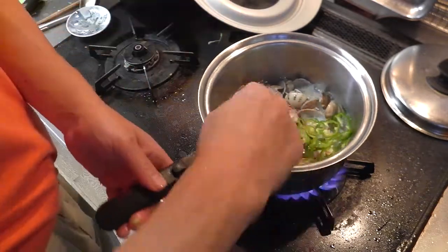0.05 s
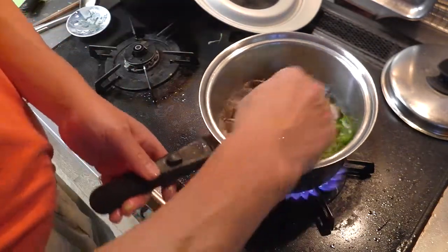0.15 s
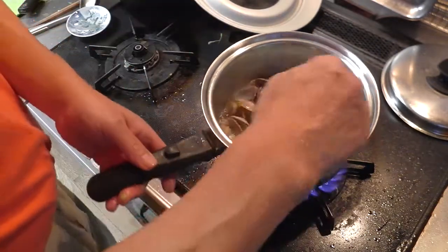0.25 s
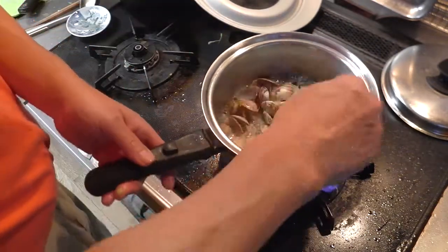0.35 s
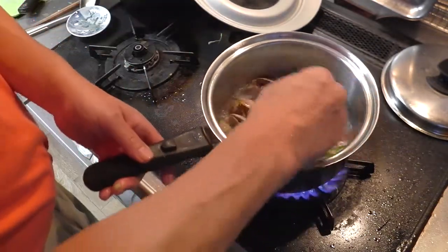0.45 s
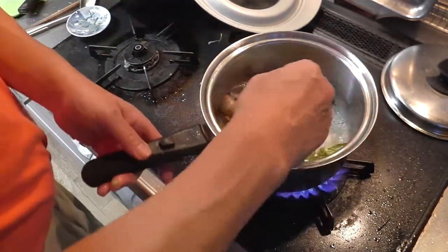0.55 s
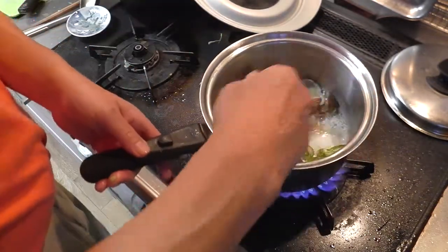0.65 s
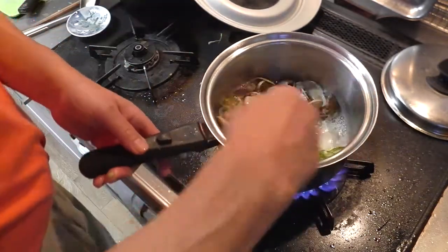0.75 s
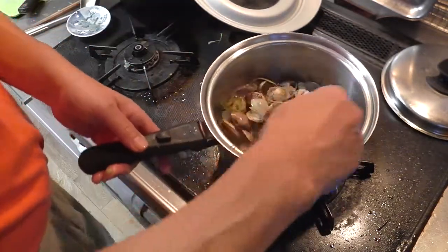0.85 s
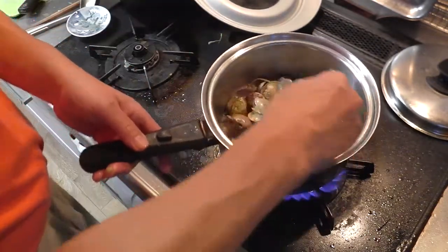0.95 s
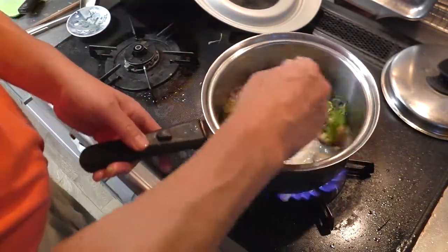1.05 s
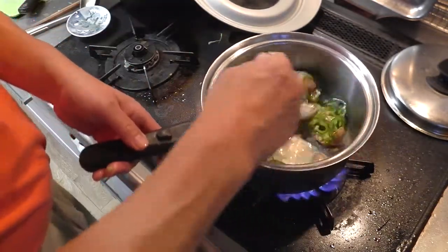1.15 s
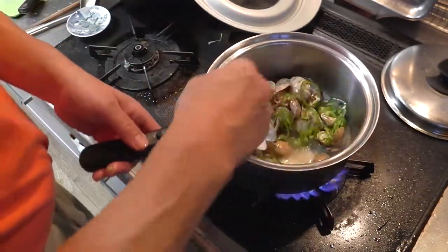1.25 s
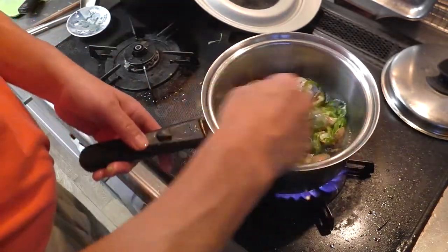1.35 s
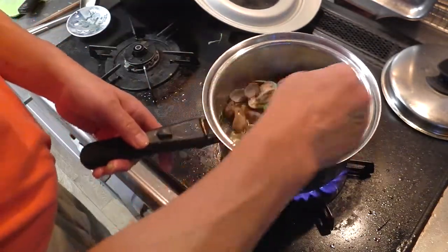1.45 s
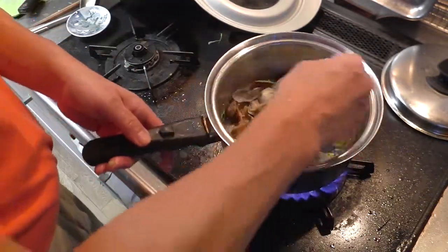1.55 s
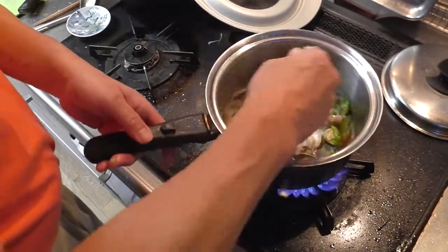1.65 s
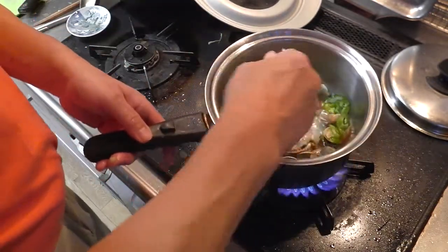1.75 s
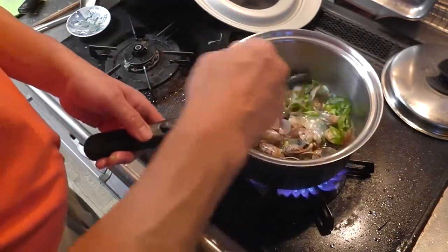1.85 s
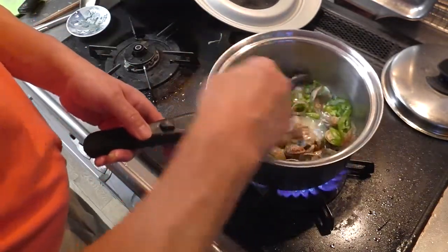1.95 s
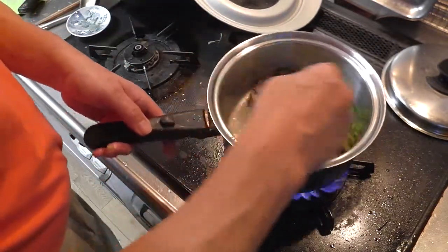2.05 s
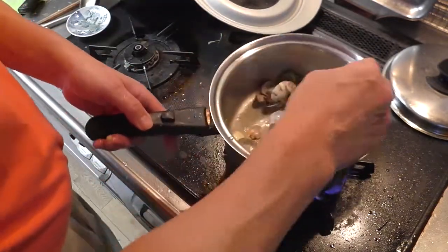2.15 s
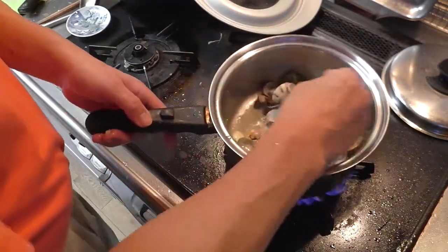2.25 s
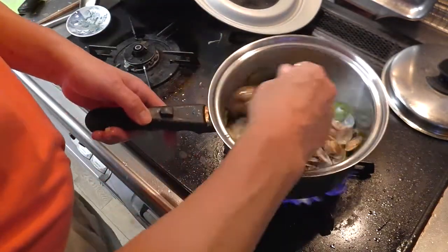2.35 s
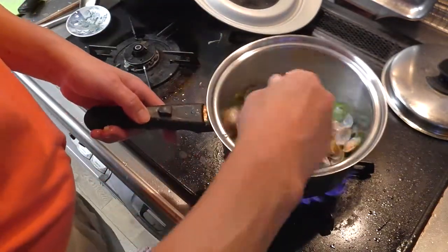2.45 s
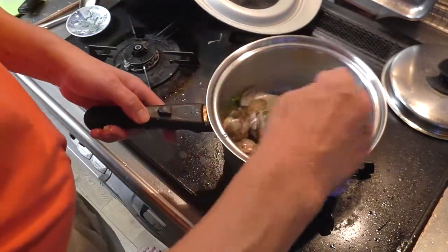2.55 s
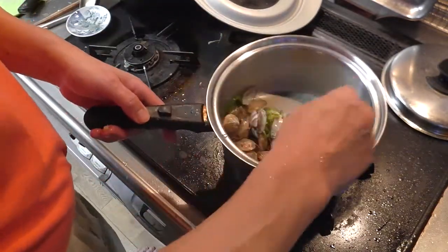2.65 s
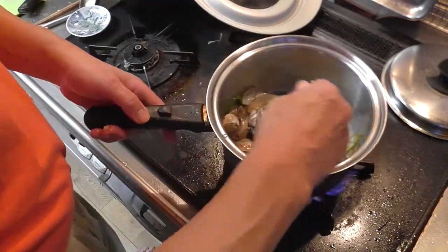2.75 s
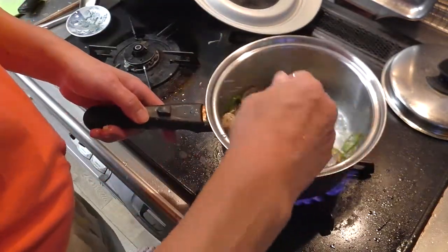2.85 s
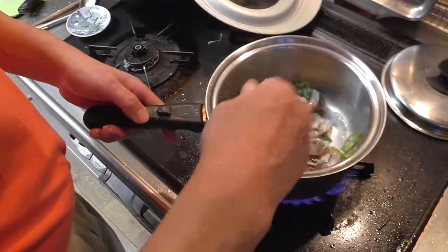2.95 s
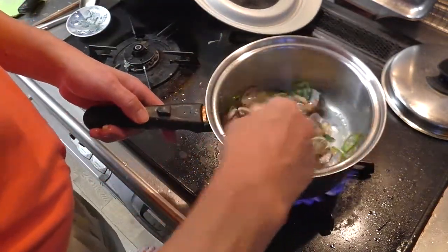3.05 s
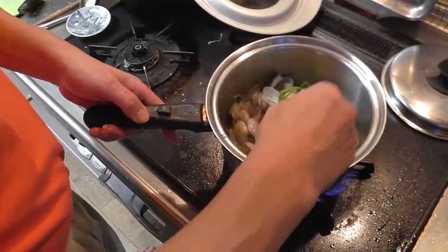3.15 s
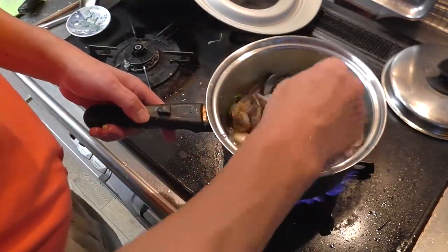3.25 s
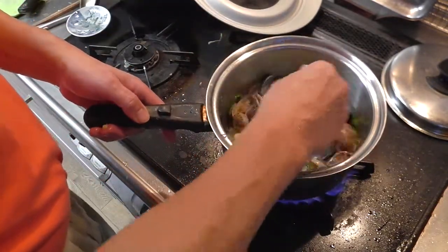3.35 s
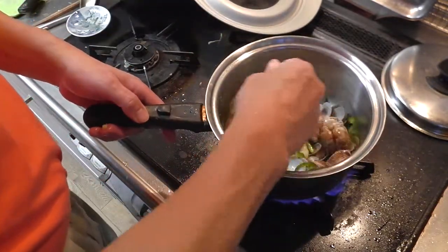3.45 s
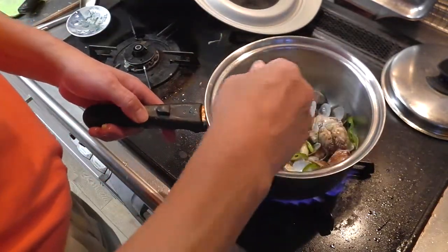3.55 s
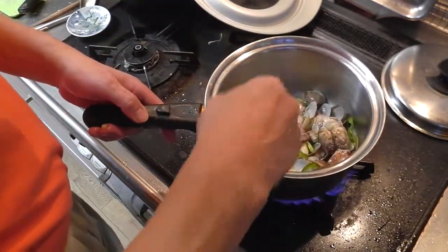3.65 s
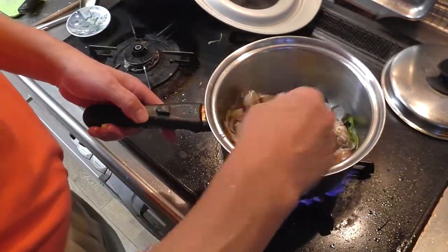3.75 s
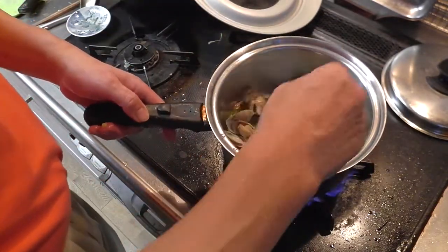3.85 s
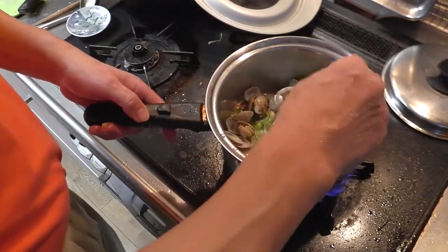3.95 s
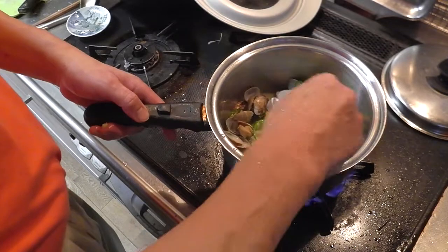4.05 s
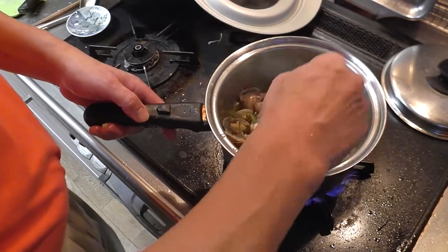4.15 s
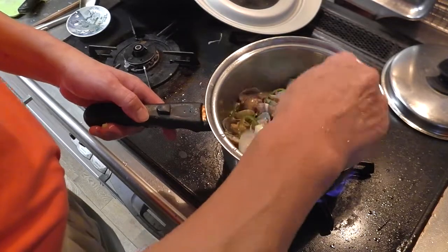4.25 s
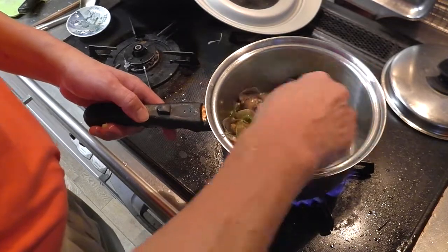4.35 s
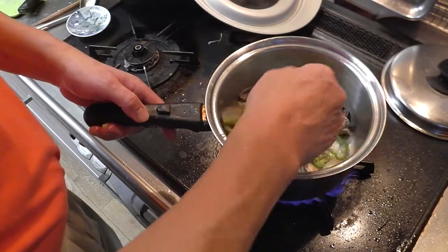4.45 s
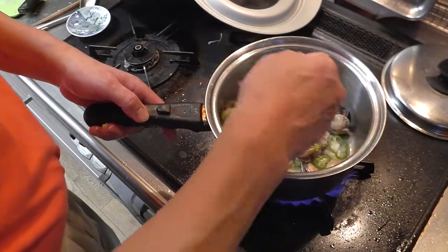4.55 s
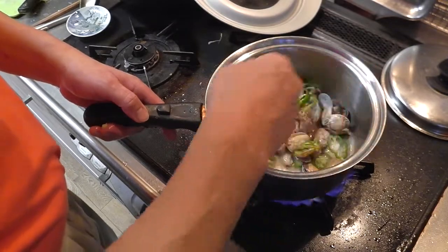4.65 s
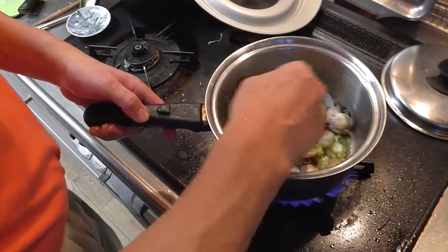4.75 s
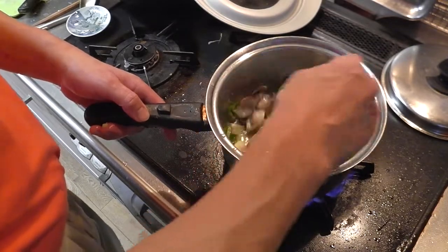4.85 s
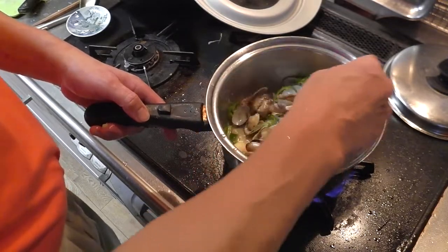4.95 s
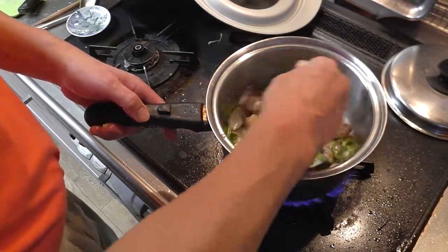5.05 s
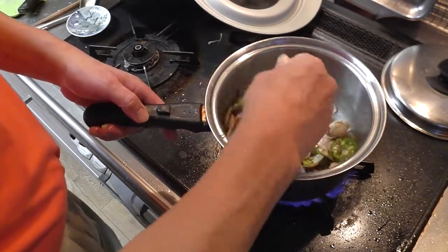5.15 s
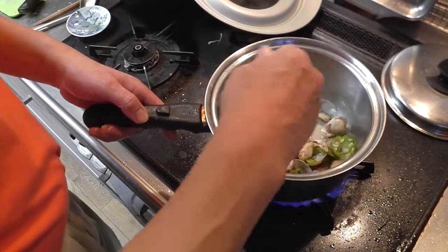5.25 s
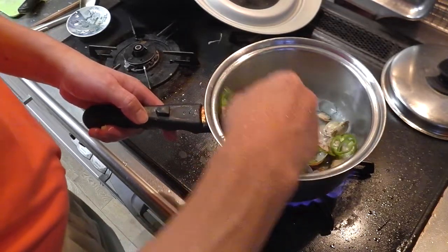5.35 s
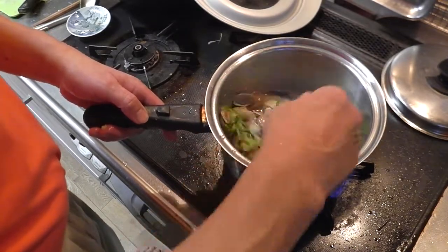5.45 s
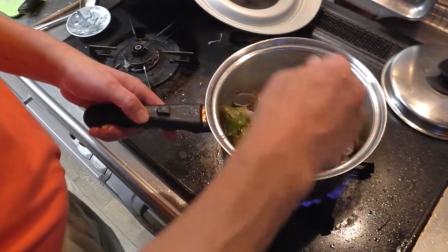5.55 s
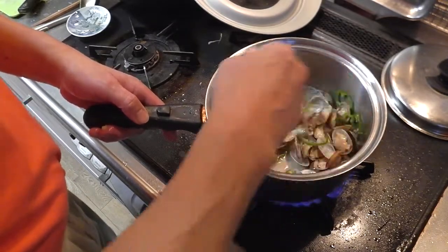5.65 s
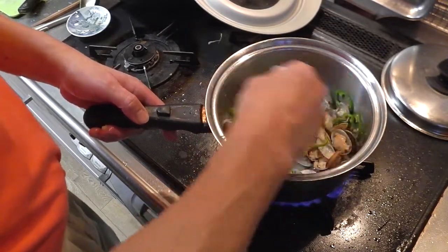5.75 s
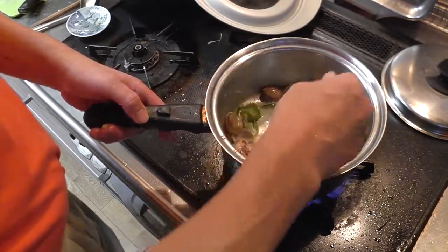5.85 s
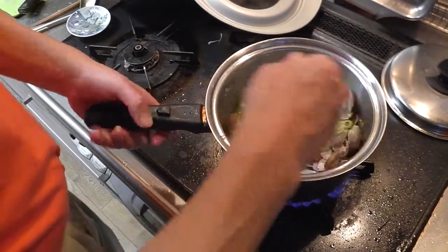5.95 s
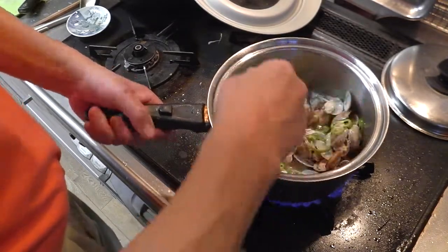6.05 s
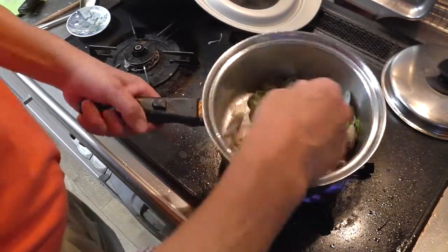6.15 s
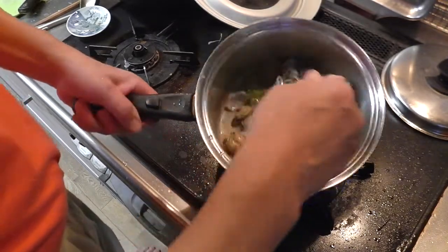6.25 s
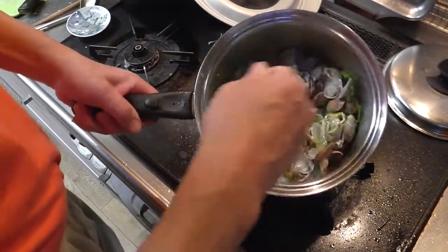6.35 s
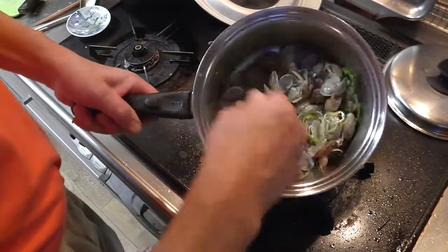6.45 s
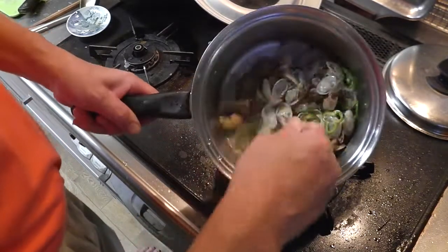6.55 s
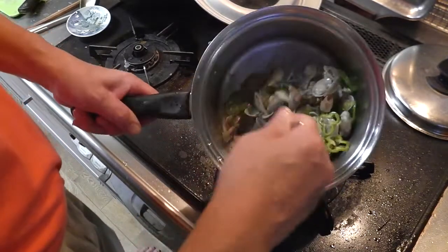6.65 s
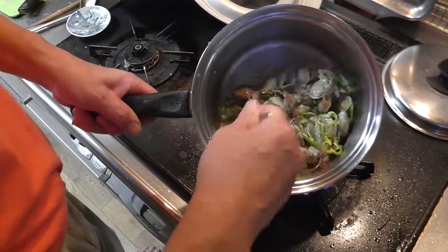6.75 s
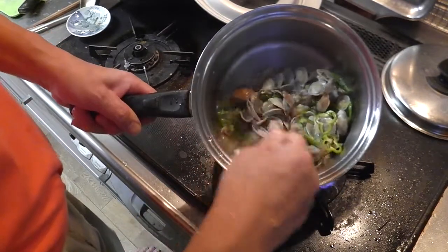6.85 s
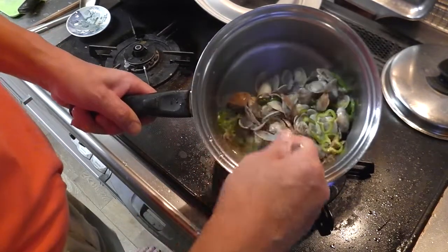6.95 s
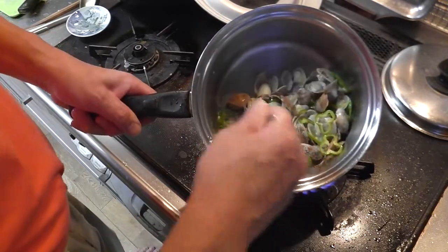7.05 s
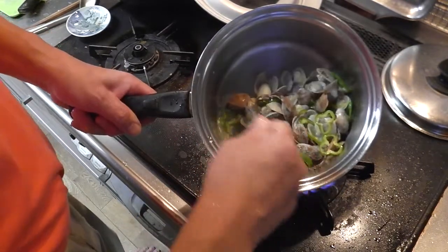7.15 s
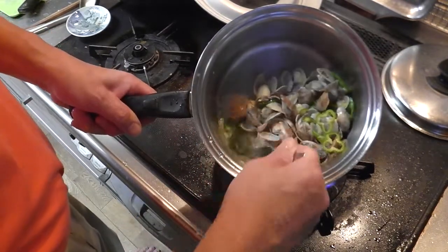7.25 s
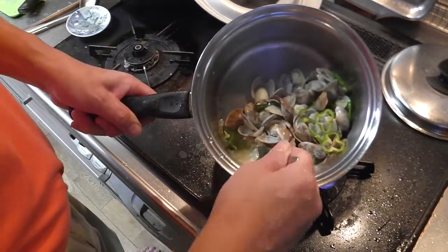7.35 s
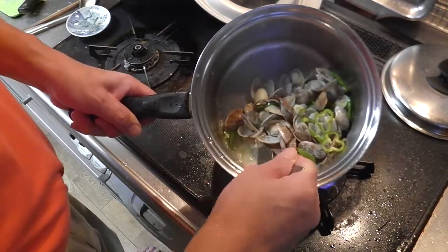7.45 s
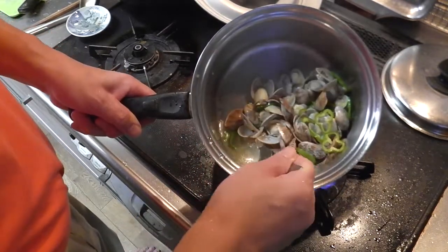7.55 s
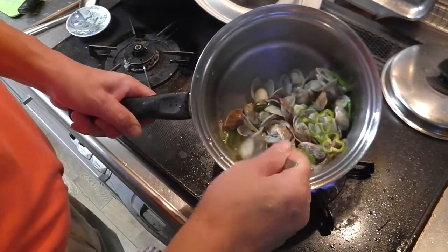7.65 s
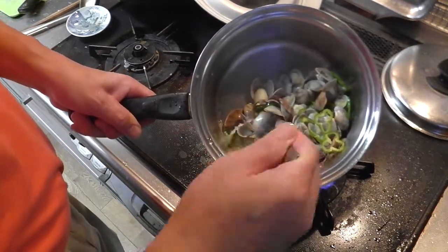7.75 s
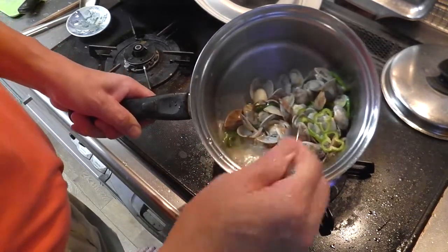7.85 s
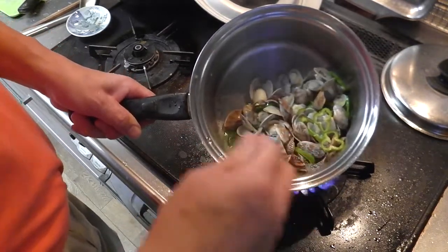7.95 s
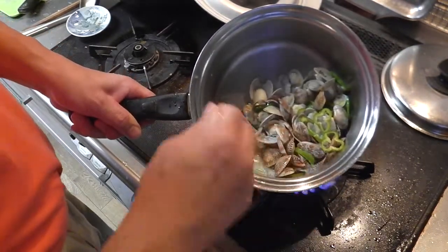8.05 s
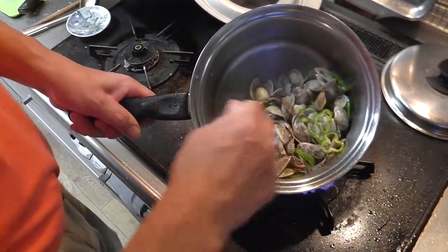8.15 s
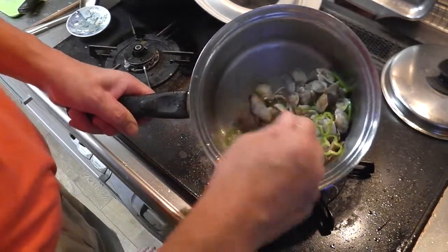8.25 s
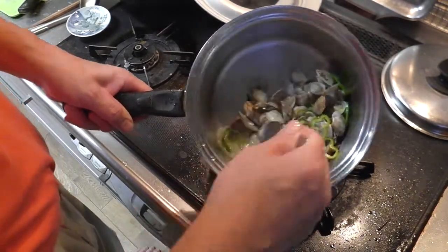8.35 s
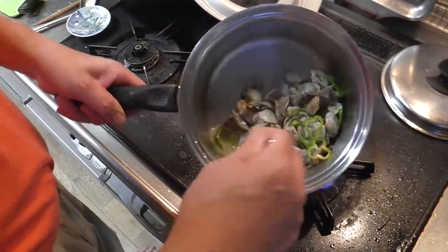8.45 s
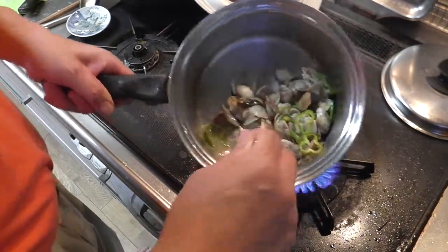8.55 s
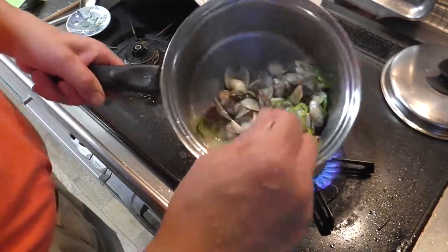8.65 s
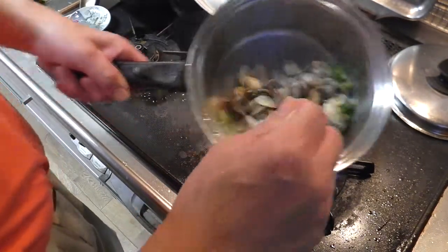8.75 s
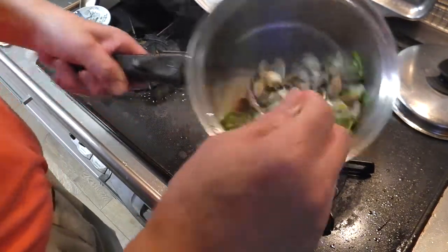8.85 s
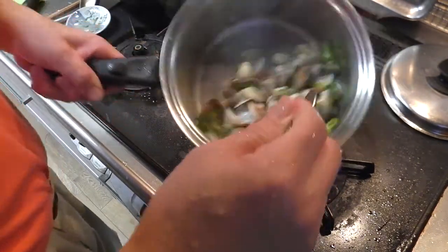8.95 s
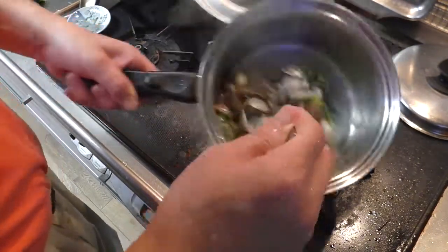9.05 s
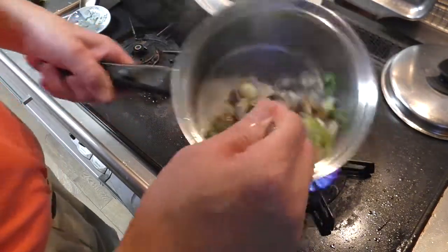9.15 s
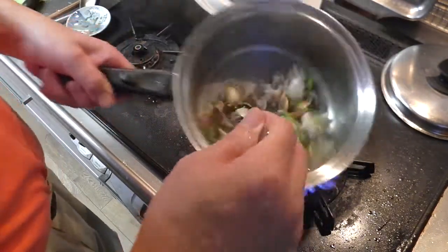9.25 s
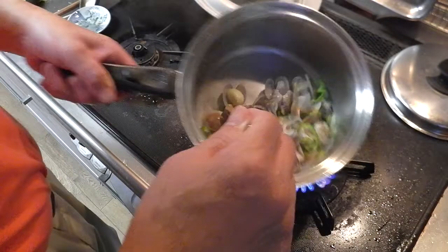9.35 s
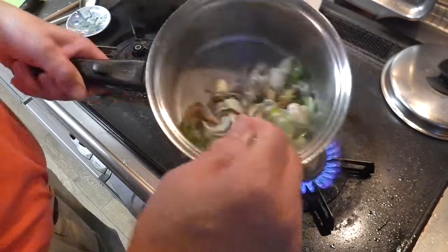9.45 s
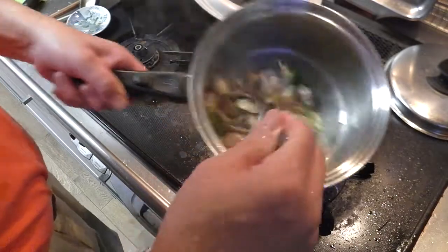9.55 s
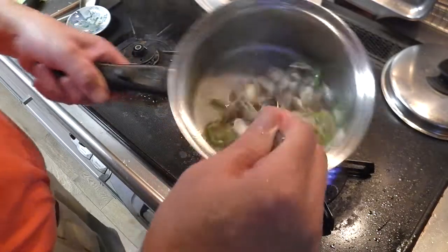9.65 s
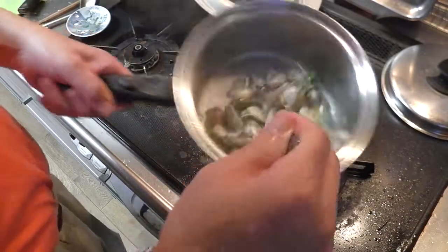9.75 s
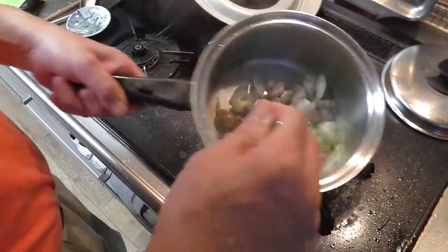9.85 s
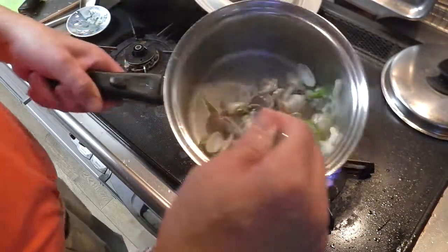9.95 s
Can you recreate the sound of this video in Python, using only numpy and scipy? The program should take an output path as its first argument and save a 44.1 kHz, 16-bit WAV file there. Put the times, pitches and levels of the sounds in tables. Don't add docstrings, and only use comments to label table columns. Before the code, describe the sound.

Close, slightly compressed stereo sound of shells tumbling in a metal pot in a home kitchen. Rapid irregular strokes give snapping edges, hollow bowl tocks and short steel clanks, while broth sizzles with tiny pops over a steady low burner and fan rumble. A strong base thump comes past six seconds, followed by a quieter gap with scattered ticks, then swishing, rattling shakes near nine seconds that settle at the end.

```python
import sys
import numpy as np
from scipy import signal
from scipy.fft import rfft, irfft, next_fast_len
from scipy.io import wavfile
from scipy.ndimage import uniform_filter1d

SR = 44100
rng = np.random.default_rng(int(sys.argv[2]) if len(sys.argv) > 2 else 0)


def how_loud(loudness_db):
    steps = np.asarray(loudness_db, float) / 20
    return 10 ** steps


def output_pcm(signal):
    pcm = np.clip(np.atleast_2d(signal).T, -1, 1) * 32767
    wavfile.write(sys.argv[1], SR, np.round(pcm).astype(np.int16))


N = 441000

# [f/Hz, level/dB]
POT_MODES = [(1447, -9), (2538, 3), (3448, 7), (4025, 1), (4160, -1), (4935, -10), (5385, -3), (5514, -12),
             (6087, -6), (6685, 2), (6860, -4.5), (6976, 1.5), (7472, 2.5), (8217, 3), (8552, 1),
             (9293, -9), (9590, 5), (10451, 1.5), (11740, -5.5), (13170, -11), (14520, -9)]
SPLIT_HZ, LAG_S = 4080, .0222


def unit(x):
    return x / np.sqrt(np.mean(x ** 2) + 1e-20)


def along(points, hz):
    f, v = np.transpose(points)
    return np.interp(np.log(hz + 1), np.log(f + 1), v)


def curves(rows):
    s, *cols = np.transpose(rows)
    return [np.interp(np.arange(N) / SR, s, c) for c in cols]


def wobble(rate):
    knots = rng.standard_normal(int(N * rate / SR) + 2)
    return np.interp(np.arange(N) * rate / SR, np.arange(len(knots)), knots)


def filtered(x, response):
    m = next_fast_len(x.shape[-1] + 8192)
    spectrum = rfft(x, m) * response(np.fft.rfftfreq(m, 1 / SR))
    return irfft(spectrum, m)[..., :x.shape[-1]]


def coloured(x, spectrum):
    return unit(filtered(x, lambda hz: how_loud(along(spectrum, hz))))


def low(hz):
    return 1 / (1 + (hz / SPLIT_HZ) ** 40)


def high(hz):
    return 1 - low(hz)


def grains(count, hz, spread, cycles, size_db):
    u, t = rng.random((count, 4)), np.arange(110) / SR
    f = np.clip(hz * np.exp(spread * rng.standard_normal((count, 1))), 300, SR / 2.2)
    life = cycles * (0.23 + 2 * u[:, 1:2] ** 3) / f
    size = how_loud(-size_db * np.log(u[:, 2:3] + .012))
    grain = size * np.exp(-t / life) * np.sin(2 * np.pi * f * t) / np.sqrt(life)
    at = (u[:, :1] * N).astype(int) + np.arange(len(t))
    return unit(np.bincount(at.ravel(), grain.ravel(), N + len(t))[:N])


def pot_modes(t60, attack):
    hz, count = np.array(POT_MODES)[:, :1], len(POT_MODES)
    t, u = np.arange(SR // 8) / SR, rng.random((count, 1))
    knots = 2.6 * rng.standard_normal((count, 14))
    flutter_db = np.array([np.interp(t * 13 / t[-1], np.arange(14), k) for k in knots])
    life = t60 * (0.46 + 0.68 * u) * (hz / 4000) ** -.2
    return how_loud(flutter_db - 60 * t / life) * np.sin(2 * np.pi * hz * t) * (1 - np.exp(-t / attack))


def duck_db():
    # [t/s of the knock, depth/dB]
    dips = [(.261, 11.5), (.645, 4), (1.122, 9), (1.789, 2), (2.119, -3.5), (2.202, 2), (2.49, 1),
            (2.617, 4.5), (2.795, 3.5), (2.938, 7), (3.93, 2.5), (4.223, 0.5), (4.565, 6.5), (4.853, 1.5),
            (5.586, 14), (5.963, 6), (6.334, 10), (6.717, 9), (7.081, 2.5), (8.165, 1), (9.085, 3.5)]
    look_ahead_s, recovery_s = 0.028, 0.035
    t, dip_db = np.arange(N) / SR, np.zeros(N)
    for s, db in dips:
        near = slice(round((s - look_ahead_s) * SR), round((s + 0.9) * SR))
        fade = np.exp(-np.clip(t[near] - s - .01, 0, None) / recovery_s)
        dip_db[near] = np.maximum(dip_db[near], db * fade)
    return -uniform_filter1d(dip_db, size=120)


def stove():
    # [t/s, flame level/dB, sizzle level/dB]
    levels = [
        (0.0, -38, -36),
        (.16, -35, -32),
        (2.17, -42, -40.5),
        (5.51, -39, -38.5),
        (6.28, -39.5, -45),
        (6.6, -43, -40.5),
        (7.21, -39.5, -43.5),
        (8.6, -36.5, -35),
        (9.11, -38, -37),
        (10.0, -41, -41),
    ]
    # [f/Hz, level/dB per Hz]
    rumble_spectrum = [(15, -56), (33, -36), (59, -18), (92, 6), (114, -10), (155, 1.5), (182, -13.5),
                       (245, -7), (275, -18), (429, -2), (671, -14), (950, -23), (1050, -34), (1180, -20),
                       (1300, -28), (1690, -58), (2860, -120)]
    # [f/Hz, level/dB per Hz]
    sizzle_spectrum = [(530, -11.5), (900, -1), (1040, -20), (1190, -12), (1360, -7.5), (2450, -5.5),
                       (2730, -8), (2960, -3), (3340, -3), (11000, -29), (16000, -11.5)]
    rumble_db, sizzle_db = curves(levels)
    noise = rng.standard_normal((2, N))
    pops = grains(count=1500, hz=6100, spread=0.59, cycles=2.7, size_db=2.5)
    rumble = coloured(noise[0], rumble_spectrum)
    hiss = coloured(noise[1] * how_loud(1.6 * wobble(30)) + 0.12 * pops, sizzle_spectrum)
    return how_loud(rumble_db + 2.0 + 0.72 * wobble(6)) * rumble + how_loud(sizzle_db) * hiss


def strokes_db():
    # [t/s, level/dB, settling/s per 20 dB, hollow part/dB]
    plunges = [(0.0, -16.5, 0.08, -10), (.04, -14.5, 0.23, -3.5), (.27, -15, 0.07, -2),
               (0.661, -15.5, 0.2, -4), (1.135, -14.5, 0.1, -17), (1.81, -25.5, 0.36, -6),
               (2.13, -25.5, 0.2, -5), (2.619, -17, 0.12, -7), (2.8, -25.5, 0.1, -10.5),
               (2.93, -21.5, .4, -5), (3.6, -25, 0.2, -2), (3.95, -21.5, 0.36, -5.5),
               (4.58, -12.5, .08, -18), (4.859, -21, 0.18, -6.5), (5.34, -22, .5, -9),
               (5.609, -11, 0.06, -11), (5.99, -19, 0.27, -4.5), (6.35, -17, 0.17, -14),
               (6.735, -19, 0.13, -7), (7.1, -18.5, 0.0649, -4)]
    # [t/s of crest, level/dB, settling/s per 20 dB, hollow part/dB]
    sweeps = [(.44, -19.5, 0.47, -2), (.97, -24, 0.2, -4), (1.22, -22, 0.62, -5), (1.539, -23, .13, -3.5),
              (1.66, -27, 0.13, -5), (1.978, -18.5, .11, -9.5), (2.31, -25, .2, -5),
              (3.15, -26.5, 0.64, -9.5), (3.31, -26, 0.4, -4.5), (3.768, -24, 0.08, -5),
              (4.1, -28.5, -0.25, -8), (4.35, -22, .25, -7), (4.76, -25, .5, -4), (5.02, -22.5, 0.2, -4.5),
              (5.2, -27, .2, -6), (5.741, -19.5, 0.19, -7), (6.49, -25, .17, -3), (7.17, -36, .5, 2),
              (8.18, -20, .08, -1.5), (8.28, -36, 1, -2.5), (8.79, -22.5, 0.15, -2), (8.95, -11, 0.09, -6),
              (9.06, -19, .1, -5), (9.29, -22.5, 0.32, -4.5), (9.45, -13, .11, -7), (9.599, -17, 0.08, -7),
              (9.73, -23, 0.22, -5), (9.82, -24, 0.05, -4.5), (9.951, -24, 0.1, -3.5)]
    rest_db, rest_hollow_db = -42, -44
    t = np.arange(0, N + 64, 64) / SR
    s, db, settle, hollow_db = np.transpose(plunges + sweeps)[..., None]
    is_plunge = np.arange(len(s))[:, None] < len(plunges)
    rise = np.where(is_plunge, .014, .9 * settle)
    level_db = db - 20 * np.maximum((s - t) / rise, (t - s) / settle)
    bright = how_loud(2 * level_db).sum(0) + how_loud(2 * rest_db)
    hollow = how_loud(2 * (level_db + hollow_db)).sum(0) + how_loud(2 * rest_hollow_db)
    return [np.interp(np.arange(N) / SR, t, 10 * np.log10(p)) for p in (bright, hollow)]


def clatter():
    # [f/Hz, level/dB per Hz]
    slide_spectrum = [(530, -13.5), (900, -20), (1000, -22.5), (1290, -4), (1700, -11), (2630, 0.5),
                      (4630, -8.5), (6800, -5.5), (10400, -7.5), (15100, -17), (16000, -60)]
    bright_db, hollow_db = strokes_db()
    edges = grains(count=6000, hz=5570, spread=0.498, cycles=9.9, size_db=2.3)
    taps = grains(count=5000, hz=7000, spread=.4, cycles=1.5, size_db=1.6)
    slide = coloured(rng.standard_normal(N), slide_spectrum) * how_loud(3.96 * wobble(70))
    shells = edges + 0.51 * coloured(taps, slide_spectrum) + 1.02 * unit(slide)

    modes = how_loud(.7 * np.array(POT_MODES)[:, 1:]) * pot_modes(t60=0.06, attack=0.0044)
    swell, ring = wobble(25), np.zeros(N)
    for k in range(3):
        spot_taps = taps * how_loud(6 * np.roll(swell, k * SR))
        ring += signal.oaconvolve(spot_taps, modes[k::3].sum(0))[:N]

    mix = (unit(shells) + how_loud(-10) * unit(ring)) * how_loud(2.8 * swell)
    air = coloured(mix, [(480, -79), (610, -9), (670, 0.5), (720, -4.5), (860, -31.5)])
    air_db = -19.5 + 0.72 * hollow_db
    bright, hollow = unit(filtered(mix, high)), unit(filtered(mix, low))
    return how_loud(bright_db + 1.1) * bright + how_loud(hollow_db - 1) * hollow + how_loud(air_db) * air


def small_contacts(rows, t60, band, gain_db, dryness):
    t, out, lost_db = np.arange(SR // 16) / SR, np.zeros(N + SR), duck_db()
    for s, db, hz in rows:
        snap = dryness * rng.standard_normal(len(t)) * how_loud(-60 * t / (.6 * t60))
        mode = .7 * np.sin(2 * np.pi * hz * t) * how_loud(-60 * t / t60)
        i = round(s * SR)
        out[i:i + len(t)] += how_loud(db + gain_db - lost_db[i]) * (snap + mode) * (1 - np.exp(-t / .0002))
    return filtered(out[:N], band)


def knocks():
    # [t/s, peak level/dB, shell pitch f/Hz, hollow part/dB]
    hard_knocks = [(.0363, 0, 4670, 5), (.2611, 8.5, 4960, -2), (.6444, 1, 5800, -12),
                   (.9747, -1, 7050, -6), (1.1194, 0, 6690, -19.5), (1.1864, 3, 8600, -12),
                   (1.3678, 0.5, 5470, -6), (1.5424, 2, 4950, -1), (2.2017, 1, 6770, 1),
                   (2.3045, 2, 5760, -12), (2.4903, .5, 6630, -9), (2.617, 7, 7380, -7),
                   (2.9374, 3.5, 10800, -8.5), (3.3043, -2, 5530, 5), (3.5862, 0.5, 5600, -7),
                   (4.2222, 1.5, 9640, 2), (4.581, -0.5, 8300, -1), (4.8523, -1, 9200, -4),
                   (5.5867, 1.5, 6840, -14), (5.608, -1.5, 9460, -7), (5.9627, 4.5, 7660, -5),
                   (6.3346, 8, 8370, -13), (6.7165, 9, 6860, -23), (6.79, -6, 2850, 5),
                   (7.1518, 0.5, 5050, -3), (8.078, .5, 6940, 4), (8.1655, 5, 5500, 2),
                   (8.4993, 1, 5500, -2.5), (9.085, 5, 7800, -1), (9.7127, 0, 8040, 2)]
    # [t/s, peak level/dB, shell pitch f/Hz]
    thin_clicks = [(0.082, -1, 5500), (.216, -2, 6750), (.555, -1, 4600), (1.789, -4.5, 8400),
                   (1.8455, -1, 6870), (2.793, -3, 7300), (3.1143, -1, 7740), (4.2883, -0.5, 5560),
                   (4.565, -2, 6680), (4.6623, 1.5, 9600), (4.941, -1, 5700), (5.1694, 0, 6950),
                   (5.257, -9, 7000), (5.3323, -12, 6570), (6.1617, -1, 5530), (6.603, -5, 6800),
                   (6.7506, -8, 6790), (7.097, -0.5, 7280), (7.265, -19, 6540), (7.437, -13, 7000),
                   (7.6161, -5.5, 7100), (8.7854, -9, 6660), (8.9145, -8, 6600), (9.18, 0, 8000),
                   (9.413, -10, 10100), (9.4938, 0, 6690), (9.773, -8, 10100), (9.8016, 1.5, 6680),
                   (9.94, -5.5, 5940)]
    # [t/s, peak level/dB, shell pitch f/Hz]
    open_clacks = [(0.173, -2, 7100), (.428, 1, 7470), (.7163, -9, 5400), (0.8354, -1.5, 5500),
                   (.954, -4.5, 8090), (1.2486, -9, 5380), (1.5209, -5, 8420), (2.0298, -6, 8100),
                   (2.1192, -2.5, 5800), (2.8798, -11, 9500), (3.1767, -7.5, 8700), (3.284, -5, 6900),
                   (3.4305, -8.5, 6230), (3.542, -7, 7100), (3.9287, -4.5, 5130), (4.729, -10, 6670),
                   (4.973, -5.5, 6380), (6.018, 0.5, 6740), (6.04, -1, 2600), (6.4554, -3, 6950),
                   (7.081, -6.5, 6900), (8.9406, -9, 6860), (9.0385, -6, 10300), (9.3017, 1.5, 5450),
                   (9.554, -.5, 6840), (9.839, -7, 7960)]
    hits = hard_knocks + [(*c, -8) for c in thin_clicks] + [(*c, 1) for c in open_clacks]
    lost_db, t, out = duck_db(), np.arange(SR // 18) / SR, np.zeros((2, N + SR))
    for s, db, hz, hollow_db in hits:
        r = rng.standard_normal((3, 7))
        grit = np.repeat(how_loud(4 * rng.standard_normal(len(t) // 30 + 1)), 30)[:len(t)]
        crack = rng.standard_normal(len(t)) * (how_loud(-60 * t / .01) + grit * how_loud(-9 - 60 * t / .05))
        pitch = np.r_[hz, [4300, 5200, 6300, 8000, 2800, 3400] * np.exp(.1 * r[0, 1:])][:, None]
        life = .021 * np.exp(.25 * r[2, :, None])
        share_db = np.array([[-.6], [-9], [-7], [-6], [-7], [-9], [-11]]) + 2.7 * r[1, :, None]
        shell = np.sum(how_loud(share_db - 60 * t / life) * np.sin(2 * np.pi * pitch * t), 0)
        hit = (.5 * crack + 0.31 * shell) * (1 - np.exp(-t / 0.00034))
        i = round(s * SR)
        out[:, i:i + len(t)] += how_loud(db - 2 - lost_db[i] + np.array([[0], [hollow_db + 1.5]])) * hit
    bright, hollow = out[:, :N]
    bright = filtered(bright, lambda f: high(f) * how_loud(-(f / 14000) ** 2 * 5.7))
    return bright + filtered(hollow, lambda f: low(f) * 1.41 * f * f / (f * f + 2200 ** 2))


def bumps():
    # [t/s, peak level/dB]
    grate_bumps = [(0.199, -27), (0.329, -40), (0.509, -31), (2.639, -25.5), (3.325, -35), (3.949, -48),
                   (6.542, -10.5), (6.599, -28), (7.109, -26.5), (8.096, -27), (8.182, -28)]
    body_spectrum = [(90, -22), (200, -9), (700, -3), (1000, -24.5), (2600, -13.5), (4500, -22.5)]
    t, out = np.arange(SR // 8) / SR, np.zeros(N + SR)
    for s, db in grate_bumps:
        push = np.sin(2 * np.pi * 480 * t) * how_loud(-60 * t / 0.035) * (1 - np.exp(-t / 0.0013))
        body = coloured(rng.standard_normal(len(t)), body_spectrum) * how_loud(-60 * t / .13)
        i = round((s - LAG_S) * SR)
        out[i:i + len(t)] += how_loud(db + 6.5) * (push + 0.48 * body)
    return out[:N]


def clanks():
    # [t/s, wall ring level/dB, base ring level/dB, struck spot (0 centre - 3 rim)]
    pot_blows = [(0.2595, -29, -14.5, 1.14), (.262, -49, -15.5, 2.6), (0.646, -31.5, -24, 1.8),
                 (1.1222, -29.5, -30, 1.4), (1.1857, -34, -25, 1.24), (1.791, -37, -21, 0.65),
                 (2.1177, -36.5, -19.5, 2), (2.3037, -31, -31, 0.71), (2.616, -39, -27, 1.8),
                 (2.879, -39.5, -28, 2.05), (2.937, -28.5, -27.5, 1.6), (3.115, -35.5, -37, 1.9),
                 (3.177, -36.5, -23, 2), (3.586, -38, -19.5, 2.5), (4.2233, -32, -19.5, 1.2),
                 (4.578, -33, -13.5, 1.9), (4.851, -32, -19.5, 1.27), (5.256, -37, -33, 2.4),
                 (5.607, -27, -17, 1.3), (5.962, -31, -22, 2.2), (6.3314, -33, -27, 2),
                 (6.715, -33, -21, 1.7), (7.096, -43, -39, 2.05), (9.413, -36.5, -31, .4)]
    base_count, off_spot_db = 4, 11
    lost_db, out = duck_db(), np.zeros(N + SR)
    wall_shape_db = np.array(POT_MODES)[base_count:, 1]
    for s, wall_db, base_db, spot in pot_blows:
        rings = pot_modes(t60=0.2, attack=0.001)
        walls_db = wall_shape_db + wall_db + 9.5 + 4 * rng.standard_normal(len(wall_shape_db))
        bases_db = base_db + 1.5 - off_spot_db * np.abs(np.arange(base_count) - spot)
        i = round(s * SR)
        out[i:i + rings.shape[1]] += how_loud(np.r_[bases_db, walls_db] - 0.77 * lost_db[i]) @ rings
    return out[:N]


def tail(t60, length):
    hz, t, z = signal.stft(rng.standard_normal(length), SR, nperseg=128)
    x = signal.istft(z * how_loud(-60 * t / t60(hz)[:, None]), SR, nperseg=128)[1]
    return x / np.linalg.norm(x)


def ports(x):
    # [f/Hz, likeness 0-1]
    likeness = [(60, 0.9), (150, 0.91), (380, 0.89), (950, 0.93), (2380, 0.96), (5980, 0.71), (15000, 0.16)]
    # [f/Hz, level/dB]
    left_lean = [(300, 0), (3000, -.5), (6000, -2.5), (12000, -3.5)]
    z = signal.stft(x, nperseg=128)[2]
    drift = np.cumsum(0.2997 * rng.standard_normal(z.shape), axis=1)
    other = signal.istft(z * np.exp(1j * drift), nperseg=128)[1][:N]
    hz = np.fft.rfftfreq(N, 1 / SR)
    turn = 1.035 * np.arccos(np.clip(along(likeness, hz), 0, 1)) / 2
    mid, side = rfft(x) * np.cos(turn), rfft(other) * np.sin(turn)
    lean = how_loud(along(left_lean, hz) * np.array([[.5], [-.5]]))
    return irfft(np.array([mid + side, mid - side]) * lean, N)


def scene():
    # [t/s, peak level/dB, f/Hz]
    edge_ticks = [(0.0468, -6, 4610), (0.4707, -10, 7360), (0.6106, -16, 4910), (0.7173, -11, 10510),
                  (0.9014, -12, 6050), (0.9754, -7, 6930), (0.9969, -13, 6960), (1.135, -8, 10640),
                  (1.2253, -13, 9600), (1.249, -11, 5360), (1.2702, -13, 6830), (1.2856, -13, 7560),
                  (1.4719, -16, 7730), (1.506, -17, 5190), (1.5214, -13, 8400), (1.5325, -12, 10380),
                  (1.6549, -14, 4840), (1.9534, -12, 7190), (2.0303, -12, 7900), (2.1032, -22, 7860),
                  (2.5794, -20, 5490), (2.7362, -18, 6740), (2.9033, -18, 4370), (3.1412, -12, 7520),
                  (3.4306, -15, 6290), (3.7417, -17, 7240), (3.8897, -24, 6930), (3.9675, -11, 5000),
                  (4.2543, -15, 6720), (4.5331, -21, 7190), (4.5539, -23, 6120), (5.2108, -13, 7540),
                  (5.2472, -19, 6930), (5.2565, -10, 14600), (5.4204, -15, 10310), (5.5808, -28, 7020),
                  (5.6893, -14, 6800), (5.7808, -13, 6830), (5.7952, -15, 7490), (5.8149, -13, 6290),
                  (5.8531, -20, 4310), (6.0763, -14, 4910), (6.1105, -15, 5840), (6.6041, -12, 6930),
                  (6.7511, -10, 7450), (8.1004, -17, 7410), (8.1394, -17, 7080), (8.7482, -19, 4330),
                  (8.7659, -15, 6650), (8.9132, -13, 9880), (9.0578, -12, 10120), (9.1464, -14, 7280),
                  (9.2633, -12, 6720), (9.3189, -10, 9540), (9.528, -13, 5430), (9.572, -11, 5000),
                  (9.6197, -11, 6070), (9.8409, -11, 7950), (9.8692, -17, 8010), (9.9398, -11, 10120)]
    # [t/s, peak level/dB, f/Hz]
    bowl_tocks = [(0.0174, -21, 3600), (0.3587, -16, 2690), (0.492, -17, 2580), (0.6205, -19, 3570),
                  (0.6734, -10, 3100), (0.7153, -15, 2480), (0.7791, -18, 3290), (1.0, -20, 3210),
                  (1.1815, -19, 2560), (1.2367, -18, 2430), (1.2852, -19, 3270), (1.348, -20, 2450),
                  (1.473, -18, 2990), (1.4921, -17, 2650), (1.5504, -13, 3600), (1.6407, -22, 3360),
                  (1.6702, -21, 3620), (2.5694, -29, 3730), (2.5981, -28, 3400), (3.1685, -23, 3420),
                  (3.6396, -23, 3700), (3.6847, -24, 3420), (3.7156, -21, 1290), (3.9708, -18, 3170),
                  (4.56, -27, 3530), (4.8358, -21, 3510), (4.9898, -18, 3570), (5.0224, -18, 3270),
                  (5.2103, -22, 3470), (5.3034, -26, 1380), (5.4265, -18, 3420), (5.7274, -22, 2110),
                  (6.0154, -11, 3790), (6.0391, -9, 2560), (6.0754, -18, 2170), (6.1403, -20, 3360),
                  (6.3119, -32, 3790), (6.4357, -22, 2560), (6.4695, -20, 2330), (6.5021, -20, 3360),
                  (6.6957, -27, 3570), (6.7507, -19, 3570), (6.7718, -22, 2800), (6.9323, -26, 3010),
                  (7.1024, -17, 3530), (7.1467, -23, 2780), (7.2602, -22, 2890), (7.4269, -27, 3320),
                  (8.8966, -22, 2970), (8.9127, -21, 2860), (8.9792, -16, 2650), (9.0234, -22, 2630),
                  (9.033, -18, 2650), (9.0663, -16, 3080), (9.1474, -23, 3040), (9.3181, -15, 3770),
                  (9.5432, -23, 2930), (9.5712, -15, 2610), (9.7699, -22, 2710), (9.8683, -23, 2930)]
    # [t/s, peak level/dB, f/Hz]
    shell_pings = [
        (3.167, -21, 3450),
        (3.18, -25, 2540),
        (4.395, -21, 8200),
        (4.663, -21, 3450),
        (5.168, -17, 6950),
        (5.334, -17, 6700),
        (6.786, -22, 2950),
        (6.958, -23, 7000),
        (7.617, -19, 7150),
    ]
    # [f/Hz, t60/s]
    room_decay = [(300, 0.17), (3000, 0.18), (12000, 0.026)]
    flame = stove()
    pot = clatter()
    pot += small_contacts(bowl_tocks, t60=.035, band=lambda f: low(f) * f * f / (f * f + 1500 ** 2),
                          gain_db=2.5, dryness=1.1)
    pot += knocks()
    pot += small_contacts(edge_ticks, t60=.018, band=high, gain_db=1.5, dryness=1.1)
    pot += bumps() + clanks()
    pot += small_contacts(shell_pings, t60=.16, band=lambda f: f > 1500, gain_db=2.5, dryness=.15)
    answer = tail(lambda hz: along(room_decay, hz), length=SR // 3)
    return ports(pot + how_loud(-11.5) * signal.oaconvolve(pot, answer)[:N] + flame)


def roll_off(x):
    return signal.sosfilt(signal.butter(12, 15900, fs=SR, output="sos"), x)


def record(dry):
    bass = filtered(dry, low)
    late_bass = np.roll(bass, round(LAG_S * SR), axis=1)
    x = (dry - bass + late_bass) * how_loud(duck_db())
    x = x / (1 + np.abs(x / 1.05) ** 6) ** (1 / 6)
    x = filtered(x, lambda f: 1 / (1 + (f / 15760) ** 150))
    return roll_off(x)


dry = scene()
out = record(dry)
output_pcm(out)
```